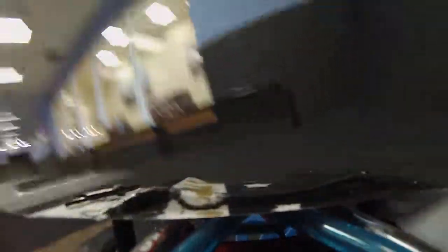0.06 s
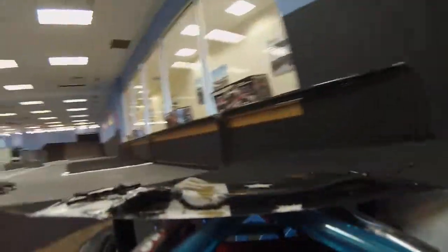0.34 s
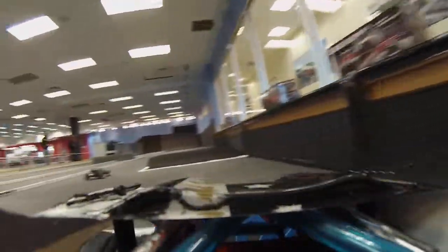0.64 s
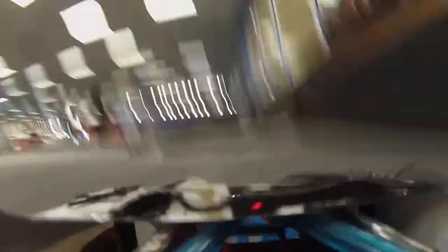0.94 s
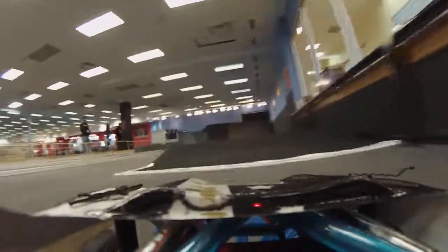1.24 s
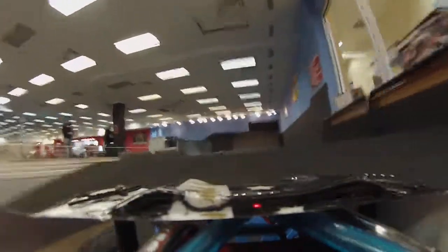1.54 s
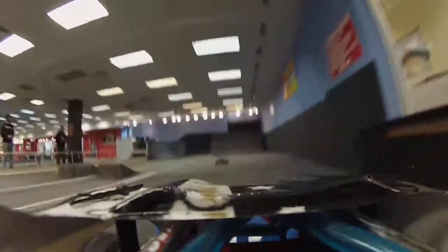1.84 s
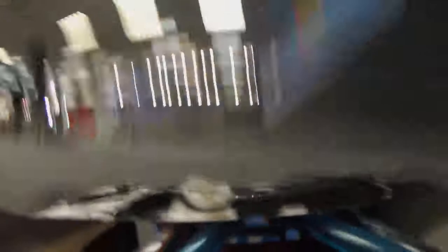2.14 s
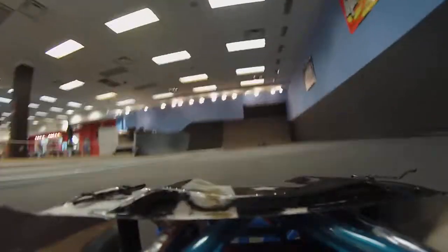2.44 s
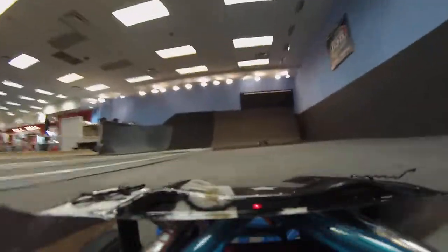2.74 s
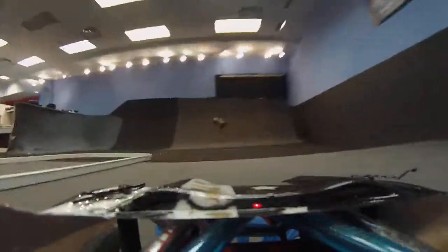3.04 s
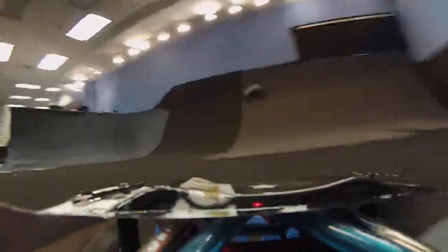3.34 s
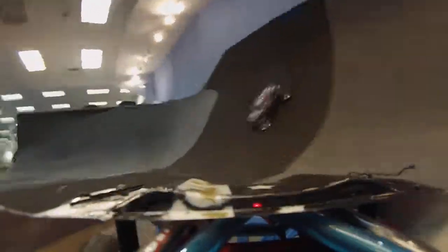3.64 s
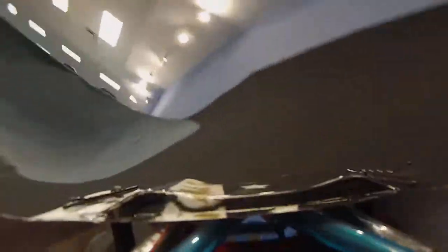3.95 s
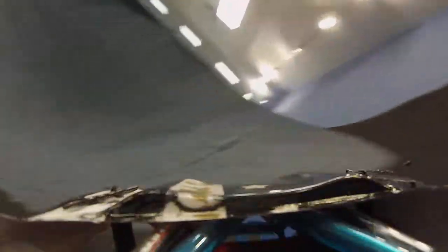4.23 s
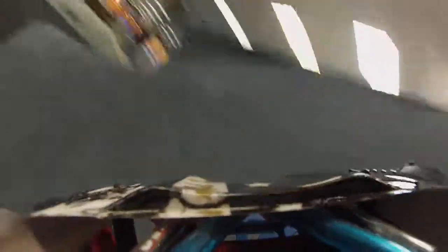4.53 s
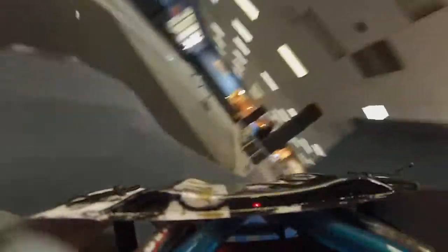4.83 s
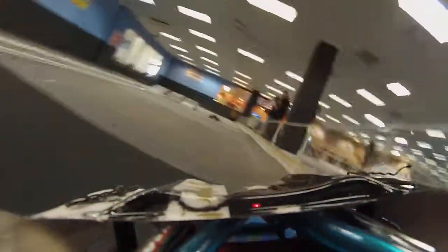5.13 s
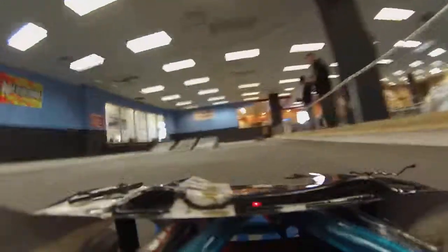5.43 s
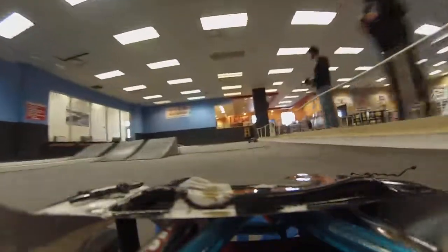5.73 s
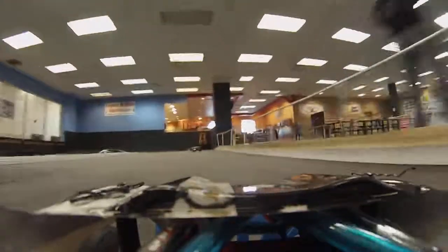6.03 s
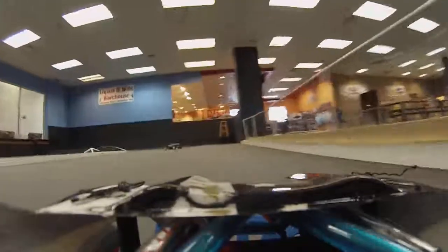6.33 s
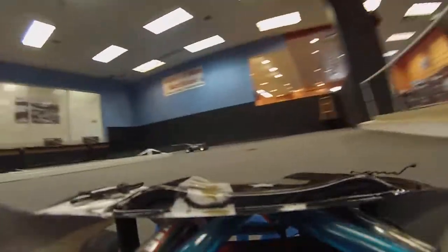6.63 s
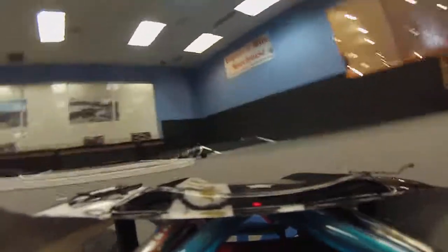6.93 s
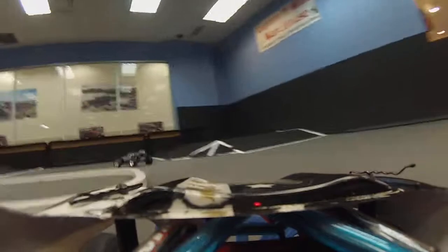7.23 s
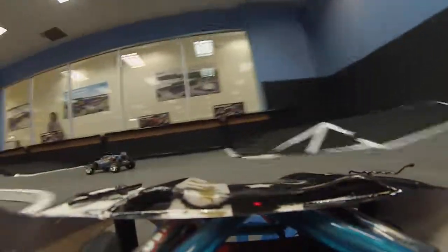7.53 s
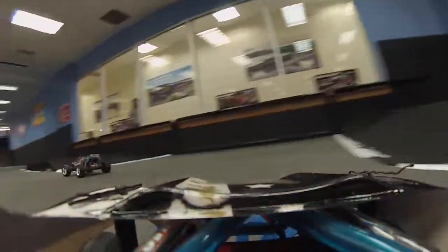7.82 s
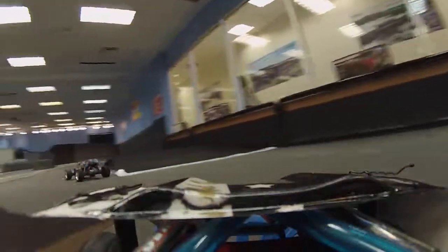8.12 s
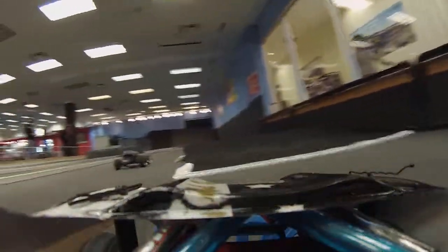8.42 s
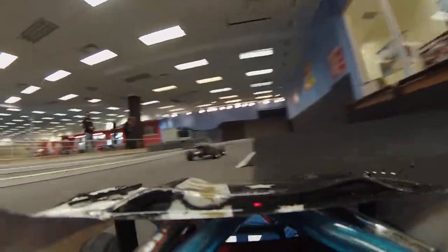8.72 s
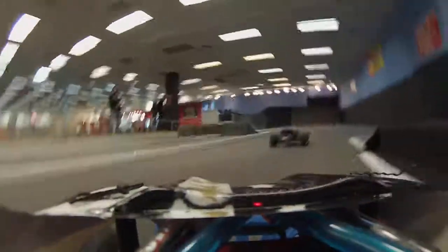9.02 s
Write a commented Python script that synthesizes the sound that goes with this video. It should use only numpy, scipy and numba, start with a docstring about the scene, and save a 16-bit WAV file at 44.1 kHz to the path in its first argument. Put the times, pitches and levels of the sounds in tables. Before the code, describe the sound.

A radio-controlled car's gears whine and rasp in rising and falling bursts, over tyre rumble, shell rattle and hard knocks, heard from on board.

```python
"""The whining gears of a radio-controlled car lapping an indoor track, heard from its own chassis.
Each pull of the throttle makes them sing at motor speed, swaying twice per wheel turn and chattering
until they take up the load; slack gears catch and squeal. Tyres rumble and flick grit, the plastic
shell rattles, stones tick, and a low hum and a thin whistle pass briefly. Bumps knock the car,
and the hardest landings overload the microphone and make it turn itself down."""
import sys
import numpy as np
from scipy import signal
from scipy.fft import rfft, irfft
from scipy.io import wavfile
from scipy.ndimage import uniform_filter1d
from numba import njit

SR = 44100
rng = np.random.default_rng(int(sys.argv[2]) if len(sys.argv) > 2 else 0)


def wrap_up_sound(samples):
    """Save the sound to the file named by the first command line argument, as 16-bit audio."""
    columns = np.atleast_2d(samples).T
    # keep every value between -1 and 1, then stretch to whole-number steps
    tamed = np.clip(columns, -1, 1)
    steps = np.round(tamed * 32767).astype(np.int16)
    wavfile.write(sys.argv[1], SR, steps)


N = 399987
T = np.arange(N) / SR


def undb(db):
    """Turn decibels into a number to multiply by."""
    return 10 ** (np.asarray(db) / 20)


def curves(table):
    """Join the points of each column with straight lines in time."""
    s, *columns = np.transpose(table)
    return [np.interp(T, s, c) for c in columns]


def gain_at(hz, spectrum):
    """Look up how strongly a table of f/Hz, level/dB passes a frequency."""
    f, db = np.transpose(spectrum)
    return undb(np.interp(np.log(hz + 1), np.log(f), db))


def colour(x, spectrum):
    """Shape the lows and highs of a sound, then set its average size (rms) to 1."""
    y = irfft(rfft(x) * gain_at(np.arange(N // 2 + 1) * SR / N, spectrum), N)
    return y / y.std()


def band(x, hz, kind, order=2):
    """Keep one range of frequencies."""
    return signal.sosfilt(signal.butter(order, np.minimum(hz, SR / 2 - 1), kind, fs=SR, output="sos"), x)


def even(x, seconds):
    """Even out slow changes in loudness and keep the quick ones."""
    size = int(seconds * SR)
    return x / np.sqrt(np.abs(uniform_filter1d(uniform_filter1d(x * x, size), size)) + 1e-12)


def wobble(rate):
    """A smooth random wobble, about 1 in size, with `rate` new values a second."""
    size = int(SR / rate)
    return 1.279 * uniform_filter1d(np.repeat(rng.standard_normal(N // size + 1), size), size)[:N]


def grains(rate, spread_db):
    """Tiny random hits, about `rate` a second, a few much bigger than the rest."""
    hits = (rng.random(N) < rate / SR) * rng.choice([-1, 1], N)
    hits = hits * undb(spread_db * np.minimum(rng.exponential(size=N), 4))
    return hits / hits.std()


def add(out, s, x):
    """Mix in a short sound, starting at second s."""
    i = max(int(s * SR), 0)
    out[i:i + len(x)] += x[:N - i]


def gliding_tone(table, waver):
    """One sliding tone, a little unsteady in pitch and loudness."""
    hz, db = curves(table)
    level = undb(db + 2 * wobble(50.5))
    return level * np.sin(2 * np.pi * np.cumsum(hz * (1 + waver * wobble(90))) / SR)


# how rough the track is: t/s, tyre rumble level/dB, shell rattle level/dB
ROUGHNESS = [(0, -32, -45), (.22, -29, -33.5), (.55, -31.5, -42.5), (.92, -21.5, -29), (1.26, -40, -44),
             (1.62, -23, -33.5), (2.15, -27, -34.5), (2.45, -31, -37), (3.1, -24, -34.5),
             (3.5, -19.5, -28.5), (3.85, -24.5, -29), (4.05, -33, -41.5), (4.4, -33, -36),
             (4.55, -26.5, -32), (5.15, -23.5, -31.5), (5.65, -27.5, -36.5), (6.55, -22, -30),
             (7.0, -22.5, -31), (7.27, -25.5, -34.5), (7.53, -24, -32), (7.95, -26.5, -37),
             (8.45, -26, -31.5), (9.07, -23, -32)]
# the tone of the rumble and of the rattle: f/Hz, level/dB
RUMBLE_COLOUR = [(12, -35), (20, 1.5), (32, -7), (70, 3), (166, -6.5), (211, -7), (242, -5.5), (400, -16),
                 (520, -19), (880, -120)]
SHELL_COLOUR = [(140, -59), (230, 1.5), (360, -6.5), (392, 0), (424, -4), (623, 3), (770, 2.5), (820, 0.5),
                (1030, -2), (1140, -6), (1500, -18), (1950, -41), (3300, -120)]

def rolling(rumble_gain_db=2, rattle_gain_db=3.5, jolt_db=2):
    """Tyres shake the chassis and the loose shell rattles on its posts; seams in the track jolt both."""
    rumble_db, rattle_db = curves(ROUGHNESS)
    rumble = undb(rumble_db + rumble_gain_db) * even(colour(rng.standard_normal(N), RUMBLE_COLOUR), 0.089)
    rattle = undb(rattle_db + rattle_gain_db) * even(colour(grains(700, 2.8), SHELL_COLOUR), 0.44)
    return undb(jolt_db * wobble(45)) * (rumble + rattle)


# main gear teeth passing each second (the tooth rate) while the tyres grip: t/s, f/Hz
SPEED = [(.42, 1952), (.56, 2628), (.81, 3049), (1.4, 3855), (1.52, 5150), (1.7, 5110), (1.8, 6970),
         (2.2, 7283), (2.52, 6525), (2.9, 7623), (3.3, 6177), (3.95, 3175), (4.28, 2873), (4.47, 3620),
         (4.65, 3610), (5.0, 5358), (5.35, 6073), (5.44, 7014), (5.54, 6688), (5.94, 7352), (6.17, 8115),
         (6.25, 6286), (6.31, 3010), (6.46, 2290), (6.6, 3300), (8.53, 2411), (8.8, 3404), (9.0, 3780)]
# the wheels slip and the motor races: peak t/s, added f/Hz, rise/s, fall/s
WHEELSPINS = [(.92, 3574, 0.096, .12), (1.0, 3020, 0.036, .04), (1.642, 2594, 0.051, .04),
              (1.771, 2367, 0.063, .03), (2.319, 2416, .06, .06), (2.6, 897, 0.067, .05),
              (2.955, 1000, 0.049, .05), (4.51, 1000, 0.038, .04), (4.61, 894, .05, .035),
              (4.705, 2350, 0.055, .05), (4.85, 2703, 0.082, .11), (4.96, 3290, 0.13, .04),
              (5.232, 2878, .16, .12), (5.79, 450.2, .05, .1), (6.005, 551, .045, .04)]

def tooth_rate():
    """How fast the teeth meet, in Hz: it follows the car's speed and jumps when the wheels spin."""
    hz, = curves(SPEED)
    return hz + sum(extra * np.interp(T, [s - rise, s, s + fall], [0, 1, 0])
                    for s, extra, rise, fall in WHEELSPINS)


# pulls of throttle and brake:
# on t/s, off t/s, rise/s, level/dB, treble/dB, whine over rasp/dB, starting chatter (0 to 1)
PULLS = [(0.369, 0.877, 0.069, -20, -1, 0.5, 0.92), (1.02, 1.4, 0.025, -30, 2, -2, 0.28),
         (1.388, 1.757, 0.025, -20.5, 1, 1, 0.14), (2.255, 3.005, .03, -22, 2, 2, 1),
         (4.172, 4.821, 0.11, -23.5, 2, 0, 0.25), (4.974, 5.146, 0.007, -24, 2, -0.5, 0),
         (5.315, 6.155, 0.032, -22.5, 2, 2.5, 1.0), (6.23, 6.289, .012, -24, -2, 1.5, 0.47),
         (6.288, 6.461, 0.0054, -30, 2.5, -12, 0.08), (6.51, 6.821, 0.013, -27.5, 5, -1.5, 0.3),
         (7.753, 8.433, .3, -30, 2.5, -26, 0.38), (8.434, 9.01, .006, -17, 0, 1, 0.87)]

def throttle(tooth_hz, release_s=0.026, settle_s=0.59, shake_share=0.38):
    """Level, treble, whine and chatter: the track shakes slack gears, each pull presses them together."""
    _, rattle_db = curves(ROUGHNESS)
    shake_db = shake_share * (rattle_db - rattle_db.mean())
    # faster gears are louder and brighter when coasting, and brighter when driven
    coast_db = 5 * np.log2(tooth_hz / 3000)
    drive_db = 7 * np.log2(tooth_hz / 7000)
    # the four controls start at their coasting values
    controls = np.array([-36.5 + coast_db + shake_db, -6 + coast_db, np.full(N, -13.5), np.full(N, .45)])
    for on, off, rise, db, treble_db, whine_db, chatter in PULLS:
        i = (T > on) & (T < off + release_s)
        age = T[i] - on
        pull = (1 - np.exp(-age / rise)) * np.minimum(1 + (off - T[i]) / release_s, 1)
        settling = chatter * np.exp(-age / settle_s)  # fades as the gears take up the load
        for control, driven in zip(controls, (db, treble_db + drive_db[i], whine_db, settling)):
            control[i] += pull * (driven - control[i])
    return controls


# how well the chassis and shell give off the whine: f/Hz, level/dB
WHINE_COLOUR = [(400, 1), (680, 0.5), (1050, -6), (1700, 2), (2700, -0.5), (3600, -2.5), (4500, -1.5),
                (5500, -2.5), (7000, 4), (8300, 0.5), (10000, -3.5), (12000, -6.5), (15000, -19.5)]

def tooth_tones(hz, tones, flicker_db=4.0):
    """The tones of meeting teeth, each flickering because no two teeth are alike."""
    phase = 2 * np.pi * np.cumsum(hz) / SR
    out = np.zeros(N)
    for multiple, db in tones:
        level = undb(db + flicker_db * wobble(350)) * gain_at(multiple * hz, WHINE_COLOUR)
        out += level * (multiple * hz < SR / 2) * np.sin(multiple * phase)
    return out


# how well the chassis and shell give off the rasp: f/Hz, level/dB
RASP_COLOUR = [(600, -2), (1100, 0), (1600, 6), (2400, 3.5), (3600, 0.5), (4600, -2.5), (5600, 3.5),
               (7500, 1), (9400, -5.5), (11000, -6.5), (12800, -18), (15500, -25)]

def tooth_rasp(flicker_db=2):
    """The thick, uneven clatter of loose teeth."""
    return colour(grains(6000, 3.6), RASP_COLOUR) * undb(flicker_db * wobble(130))


# where the gearbox and chassis plate ring: f/Hz, width/Hz, level/dB over the direct sound
HOUSING = [(1700, 590, -8), (1970, 26, -7.5), (2376, 266, 1.5), (2920, 140, -9), (3136, 150, -1.5),
           (3700, 86, -0.5), (5270, 140, -4), (6700, 190, -1), (7140, 62, -22), (8430, 42, -32),
           (8570, 73, 0.5), (9900, 180, -11)]

def housing(x):
    """The direct sound plus the ringing of the case around the gears."""
    return x + sum(undb(db) * signal.lfilter(*signal.iirpeak(hz, hz / width, fs=SR), x)
                   for hz, width, db in HOUSING)


# tones of the whine (the axle gears meet at a quarter of the rate): multiple of tooth rate, level/dB
GEAR_TONES = [(.25, 0.5), (.5, -3.5), (.75, -9), (.88, -9.5), (1, 1.5), (1.25, -10), (1.5, -34), (2, -4),
              (3.001, -10)]

def gears(sway=0.109, teeth_per_sway=113, throb=0.41, jitter=.01, split_hz=4300, body_db=2.0):
    """Gear teeth whine and rasp; the drive joints speed them up and slow them twice per wheel turn."""
    tooth_hz = tooth_rate()
    level_db, treble_db, whine_db, chatter = throttle(tooth_hz)
    chatter = np.clip(chatter * (1 + 0.21 * wobble(12)), 0, 1)
    sway_phase = 2 * np.pi * np.cumsum(tooth_hz * (1 + 0.0371 * wobble(40))) / teeth_per_sway / SR
    swing = sway * chatter ** 0.49 * (1 + 0.275 * wobble(30))
    # slow gears have more time to rattle in the gaps between their teeth
    looseness = jitter * (7000 / tooth_hz) ** 0.88
    hz = tooth_hz * (1 + swing * np.cos(sway_phase) + looseness * wobble(900))
    # teeth press hardest while the shaft slows, so each throb is a falling chirp
    press = np.exp(throb * chatter * np.sin(sway_phase))
    teeth = housing(press * (undb(whine_db) * tooth_tones(hz, GEAR_TONES) + tooth_rasp()))
    # filter forwards, then backwards, so the low body and the treble stay in step
    forwards = band(teeth, split_hz, "low", order=4)
    body = band(forwards[::-1], split_hz, "low", order=4)[::-1]
    treble = teeth - body
    return undb(level_db) * (undb(body_db) * even(body, 0.059) + undb(treble_db) * even(treble, 0.091))


# small, hard hits: t/s, level/dB
TICKS = [(0.035, -10), (0.1346, -11), (0.3993, -15), (3.665, -13), (3.905, -14.5), (6.9674, -10.5),
         (7.0545, -6), (7.1873, -13.5), (7.424, -14.5), (8.44, -5)]

def ticks(gain_db=3, decay_s=0.0015):
    """Links and stones snap against the chassis with a dry tick."""
    out, t = np.zeros(N), T[:SR // 30]
    for s, db in TICKS:
        tick = band(rng.standard_normal(len(t)) * np.exp(-t / decay_s), [1200, 7000], "band", order=3)
        add(out, s, undb(db + gain_db) * tick / np.abs(tick).max())
    return out


# the notes the plastic shell rings at: f/Hz, level/dB, time to fade by 60 dB/s
SHELL_NOTES = [(178, -5, 0.089), (249, 4.5, 0.048), (339, 4.5, 0.025), (431, -1, 0.053), (569, 9, 0.04),
               (660, -2.5, 0.11), (770, -33, 0.055), (920, -16, 0.11), (1350, -31, .02)]
# bumps and landings: t/s, shell level/dB, thump level/dB, crack level/dB
KNOCKS = [(.037, -9.5, -10.5, -30), (.076, -9.5, -11, -22.5), (.112, -9, -23, -20), (.167, -12, -16, -19),
          (0.185, -10, -12, -14.5), (0.71, -9.5, -15, -14), (.95, 1, -6, -9), (1.001, -5, -25, -13),
          (1.023, -2.5, -15, -12.5), (1.618, -8.5, -7.5, -18), (2.159, -5, -9, -3), (2.174, -4, -10, -18),
          (2.183, -5, -13, -20), (2.205, -4.5, -24, -17), (2.222, 22.5, -18, -5), (3.282, -10.5, -27, -10),
          (3.322, -9.5, -12, -33), (3.646, -5, -7, -8), (3.832, 0.5, -11, -11), (3.848, -4, -19, -19),
          (3.871, -6, -16, -17), (3.93, -5, -12, -25), (4.374, -4, -8, -20), (4.471, -3, -14, -23),
          (4.652, -9, -17, -25), (5.264, 2, -29, -5.5), (5.316, 19.5, -42, -1), (6.555, -6.5, -8, -13),
          (6.807, -8.5, -14, -32), (6.874, -12, -27, -17), (6.897, -4, -48, -18), (6.965, -2, -9, -20),
          (7.058, -6, -12, -13.5), (7.423, -7.5, -20, -33), (7.473, -11, -22, -14), (7.509, -4.5, -10, -16),
          (7.62, -11, -15, -15.5), (7.675, -11, -15, -33), (8.397, -9.5, -24, -27), (8.446, -3, -20, -25),
          (8.92, -16, -1, -24)]

def knocks(contact_s=0.0047, thump_hz=65, thump_s=0.0051, crack_s=0.0095, crunch_db=-3):
    """Each blow crunches and rings the shell, thumps the suspension and makes the plastic crack."""
    out, t = np.zeros(N), T[:SR // 6]
    for s, shell_db, thump_db, crack_db in KNOCKS:
        detune = 1 + 0.061 * rng.standard_normal(len(SHELL_NOTES))
        detune /= 2 ** (0.0191 * max(shell_db, 0))  # hard landings push the pitch down
        # heavy blows bend the whole shell and favour its low notes
        db_per_octave = -0.047 * (shell_db + 11)
        notes = sum(undb(db + db_per_octave * np.log2(hz / 500) - 60 * t / fade_s)
                    * np.sin(2 * np.pi * hz * shift * t)
                    for (hz, db, fade_s), shift in zip(SHELL_NOTES, detune))
        clatter = rng.standard_normal(len(t)) * np.sqrt(t / contact_s) * np.exp(-t / contact_s)
        ring = signal.fftconvolve(clatter, notes)[:len(t)]
        crunch = band(clatter, [190, 850], "band")
        shell = ring / np.abs(ring).max() + undb(crunch_db) * crunch / np.abs(crunch).max()
        thump = np.sin(2 * np.pi * thump_hz * detune[0] * t) * t / thump_s * np.exp(1 - t / thump_s)
        crack = band(rng.standard_normal(len(t)), [1100, 7000], "band") * np.exp(-t / crack_s)
        add(out, s, undb(shell_db - 2) * shell - undb(thump_db + 2) * thump + undb(crack_db - 2) * crack)
    return out


# tones of a squeal, where the motor's gear presses hardest: multiple of tooth rate, level/dB
SQUEAL_TONES = [(.25, -6.5), (0.309, -8), (.5, -6.5), (1.001, -2.5), (2, -3), (3, 2), (4.001, -44)]
# runs of slack gears catching: first t/s, end t/s, gap/s, level/dB
CATCHES = [(0.893, .93, .0276, -5), (.994, 1.01, .03, -3.5), (2.118, 2.15, .024, -8),
           (3.178, 3.314, .0209, -7.5), (3.364, 3.607, .07, -11), (4.8404, 4.94, 0.02, -3.5),
           (4.952, 4.983, 0.0196, -7), (5.16, 5.25, .0243, -6.5), (6.2394, 6.287, 0.019, -8),
           (6.453, 6.47, 0.023, -11.5), (6.849, 7.75, .0872, -14.5), (7.822, 8.1, .0765, -16),
           (8.151, 8.26, 0.047, -13), (8.336, 8.38, .037, -12)]

def squeals(length_s=.016, lead_s=.005, glide=0.315, fast_hz=4500, slow_hz=2500, whine_db=5, gain_db=-8):
    """Slack teeth catch: a slow shaft is jerked faster and chirps up, a fast one brakes and chirps down."""
    tooth_hz = tooth_rate()
    grip, bend = np.zeros(N), np.zeros(N)
    progress = np.linspace(0, 1, int(length_s * SR))
    for first, end, gap, db in CATCHES:
        for s, (late, strength) in zip(np.arange(first, end, gap), rng.standard_normal(size=(32, 2))):
            start = s - lead_s + 0.043 * gap * late
            add(grip, start, undb(db + gain_db + 1.4 * strength) * np.sin(np.pi * progress) ** 2)
            add(bend, start, progress - .5)
    hz = tooth_hz * (1 + glide * np.sign(fast_hz - tooth_hz) * bend + .012 * wobble(900))
    bright = housing(undb(whine_db) * tooth_tones(hz, SQUEAL_TONES) + tooth_rasp())
    dull = band(bright, 4200, "low")  # slow teeth meet softly
    fast = np.clip((tooth_hz - slow_hz) / (fast_hz - slow_hz), 0, 1)
    return grip * even(fast * bright + (1 - fast) * dull, 0.019)


# the path of the hum: t/s, f/Hz, level/dB
HUM = [(1.75, 320, -90), (1.8, 316, -28), (1.95, 289.5, -22.5), (2.14, 261.7, -17.5), (2.2, 246.4, -84)]

def airborne_hum():
    """A low hum sinks while the car is in the air."""
    return gliding_tone(HUM, waver=0.0255)


# patches of grit on the floor: middle t/s, half length/s, level/dB
GRIT = [(3.6, 0.59, -37), (7.345, 0.67, -37.5)]

def grit(per_second=130, decay_s=0.002, band_hz=(2000, 9800)):
    """The tyres flick grit against the chassis, loudest in the middle of each patch."""
    bursts = signal.fftconvolve(np.abs(grains(per_second, 2)), np.exp(-T[:SR // 30] / decay_s))[:N]
    spray = band(bursts * rng.standard_normal(N), band_hz, "band", order=4)
    level = sum(undb(db) * np.maximum(1 - ((T - s) / half) ** 2, 0) for s, half, db in GRIT)
    return level * spray / spray.std()


# the path of the whistle: t/s, f/Hz, level/dB
WHISTLE = [(3.95, 12300, -95), (3.99, 11960, -45), (4.07, 10690, -51), (4.2, 11450, -45), (4.3, 11700, -58),
           (4.4, 11700, -92)]

def drive_whistle():
    """The drive whistles thinly while the car coasts up a ramp."""
    return gliding_tone(WHISTLE, waver=.02)


def scene():
    """Everything sits centimetres from one microphone, so the hall is not heard."""
    car = gears() + squeals() + rolling() + knocks() + ticks() + grit() + airborne_hum() + drive_whistle()
    return np.array([car, car])


@njit
def follow_peaks(x, attack_s, release_s):
    """Track how loud a sound is, rising quickly and falling slowly."""
    out, level = np.empty(len(x)), 0.
    for i in range(len(x)):
        level += (abs(x[i]) - level) / (SR * (attack_s if abs(x[i]) > level else release_s))
        out[i] = level
    return out


def record(dry, mic_db=-1, ceiling_db=-4, attack_s=0.0013, release_s=0.088, top_hz=15500):
    """The microphone turns down after hard landings; peaks that slip by are flattened, the top is cut."""
    x = undb(mic_db) * dry
    gain = undb(ceiling_db) / np.maximum(follow_peaks(x[0], attack_s, release_s), undb(ceiling_db))
    treble_cut = signal.ellip(12, .2, 90, top_hz, fs=SR, output="sos")
    return signal.sosfilt(treble_cut, np.clip(gain * x, -1, 1))


dry = scene()
out = record(dry)
wrap_up_sound(out)
```